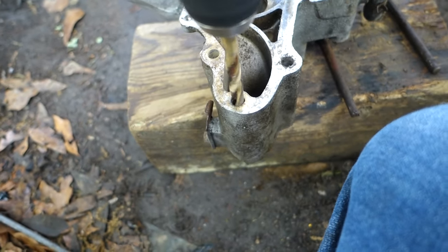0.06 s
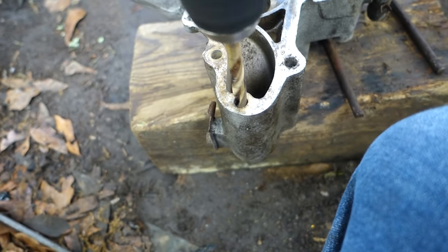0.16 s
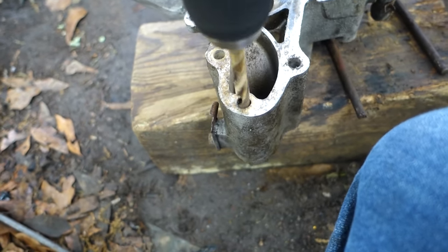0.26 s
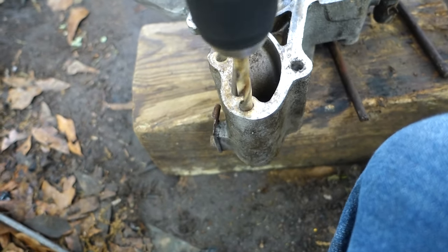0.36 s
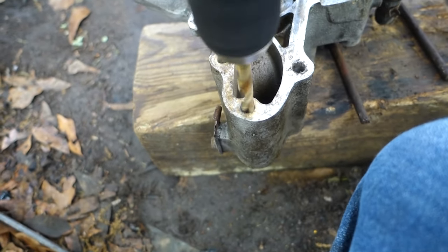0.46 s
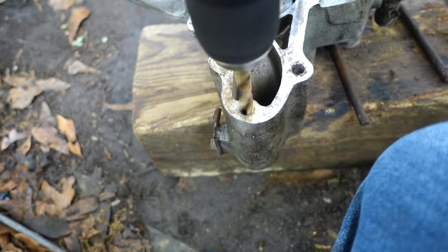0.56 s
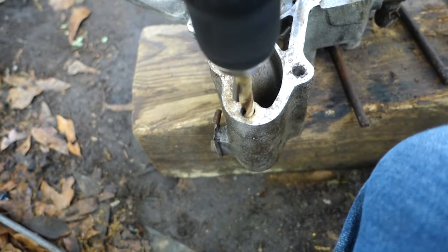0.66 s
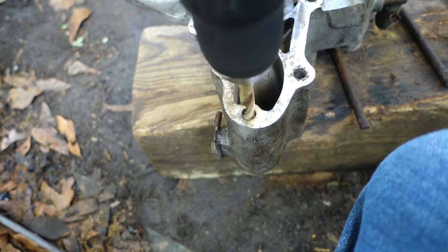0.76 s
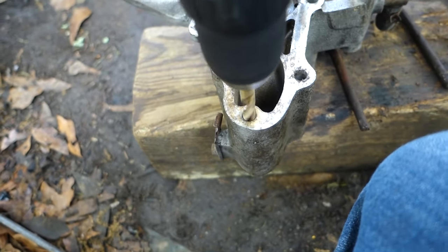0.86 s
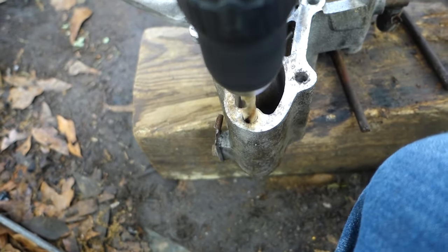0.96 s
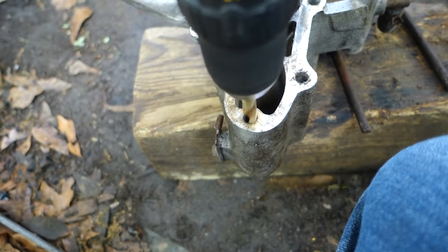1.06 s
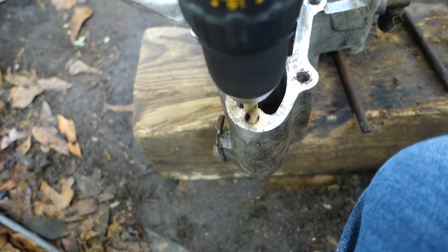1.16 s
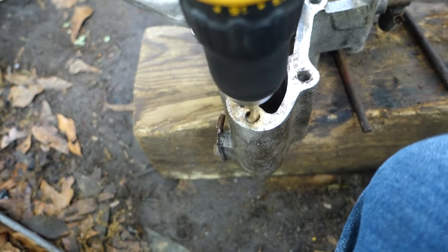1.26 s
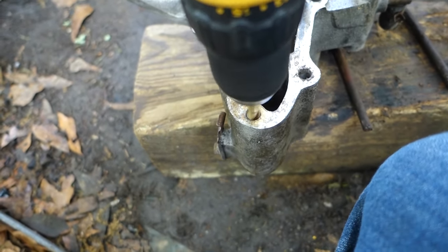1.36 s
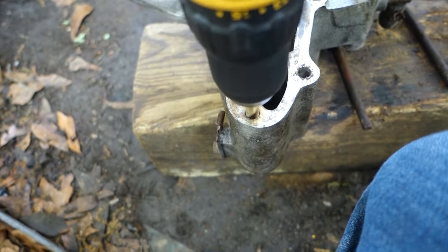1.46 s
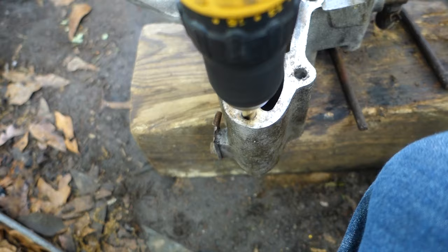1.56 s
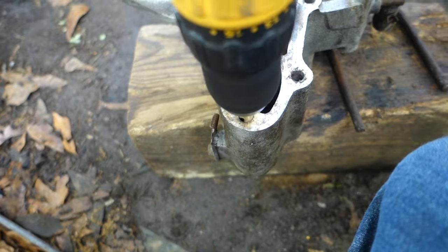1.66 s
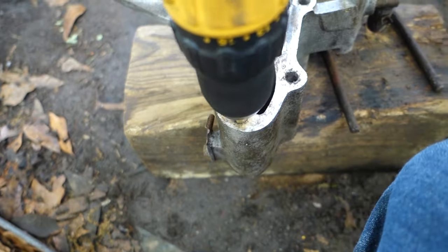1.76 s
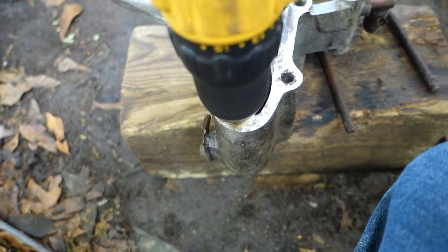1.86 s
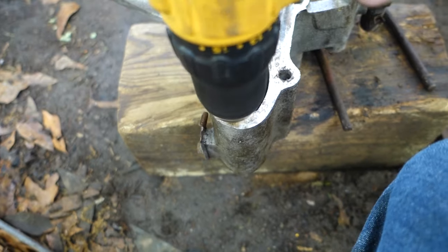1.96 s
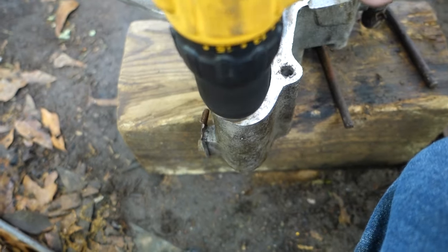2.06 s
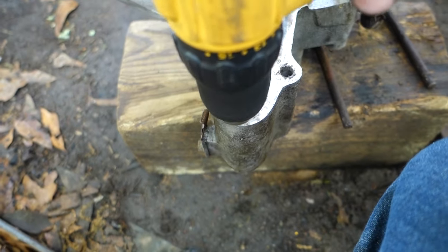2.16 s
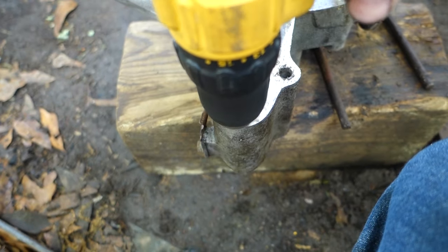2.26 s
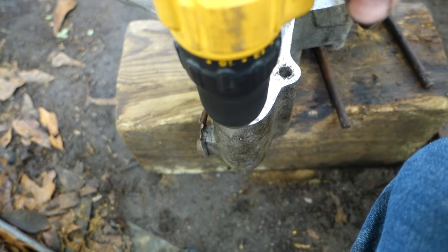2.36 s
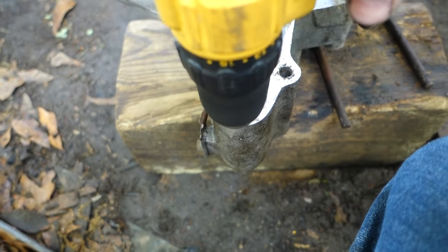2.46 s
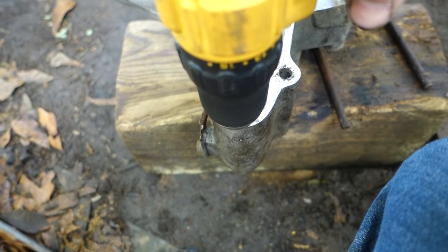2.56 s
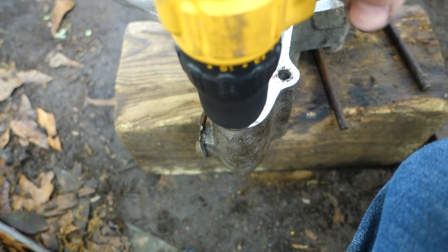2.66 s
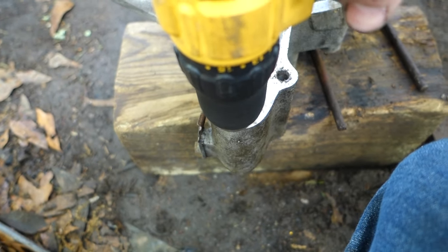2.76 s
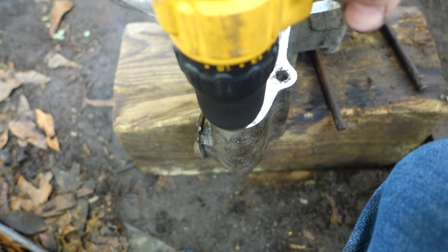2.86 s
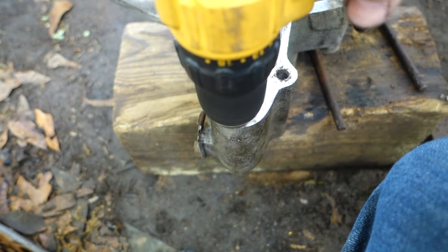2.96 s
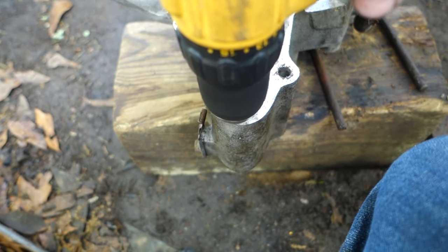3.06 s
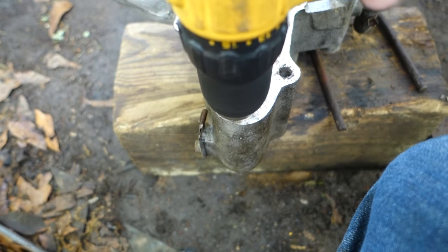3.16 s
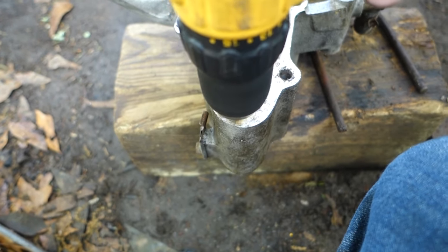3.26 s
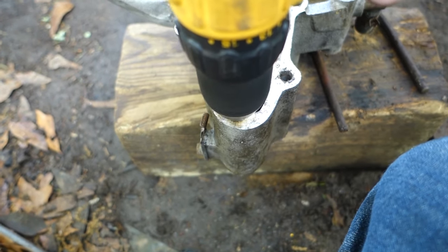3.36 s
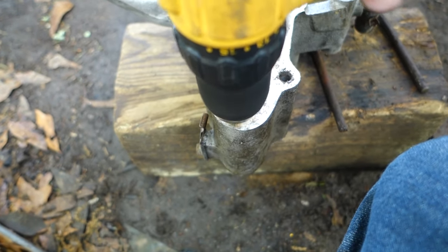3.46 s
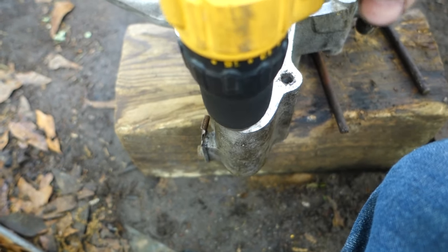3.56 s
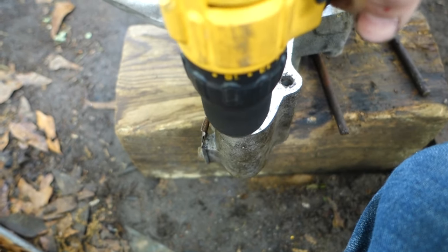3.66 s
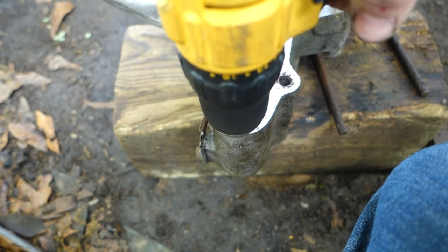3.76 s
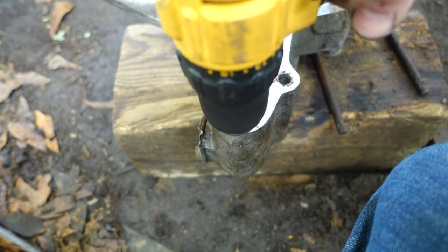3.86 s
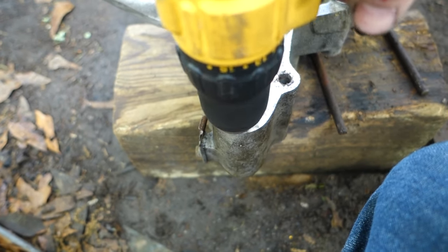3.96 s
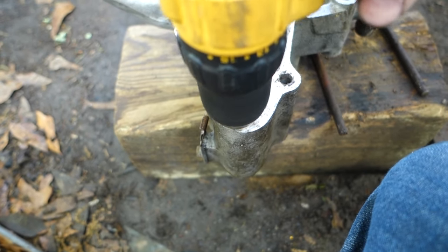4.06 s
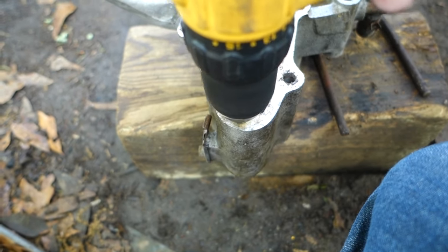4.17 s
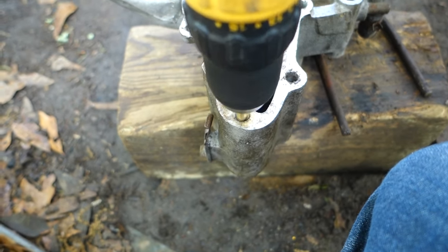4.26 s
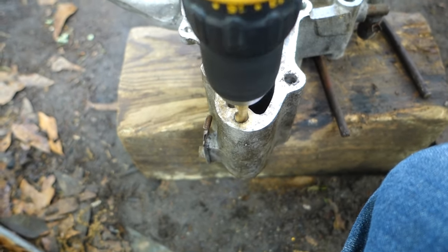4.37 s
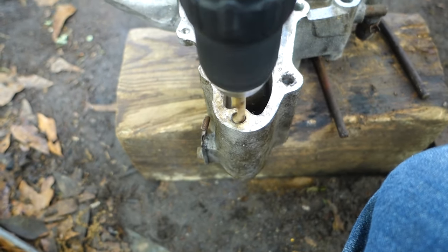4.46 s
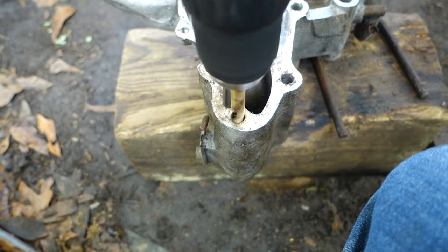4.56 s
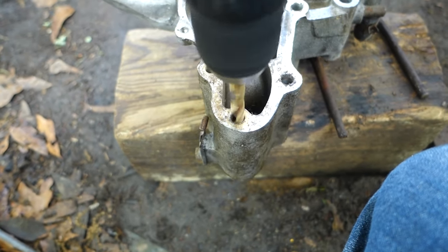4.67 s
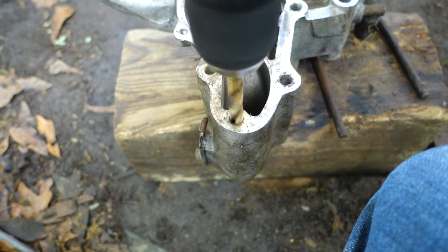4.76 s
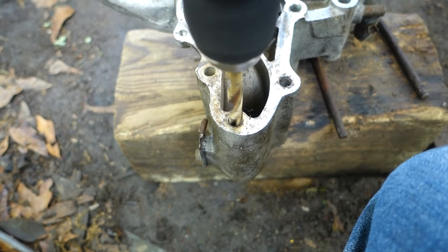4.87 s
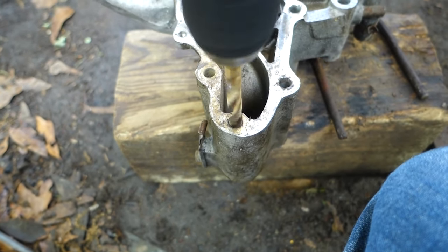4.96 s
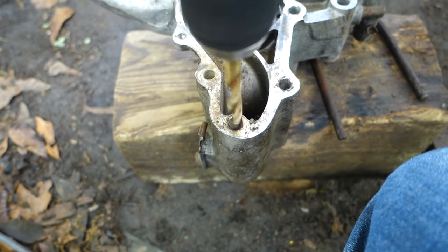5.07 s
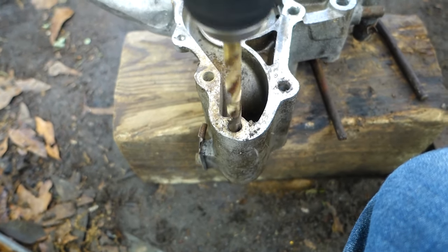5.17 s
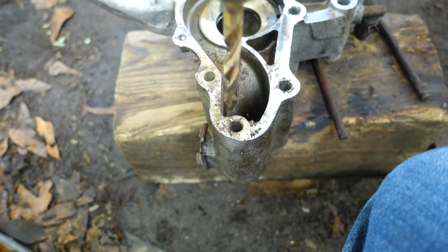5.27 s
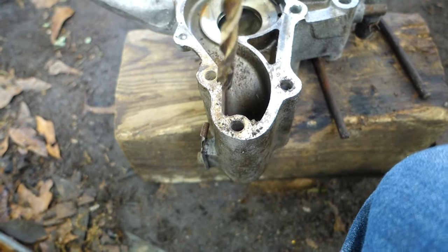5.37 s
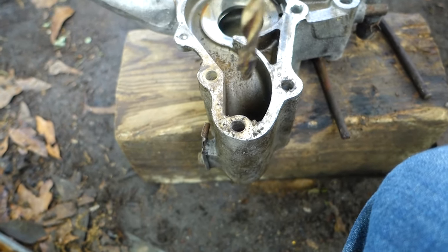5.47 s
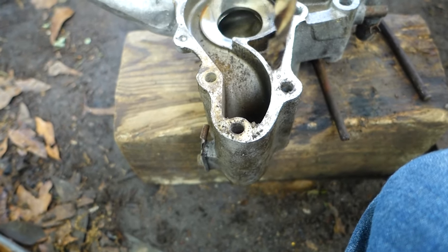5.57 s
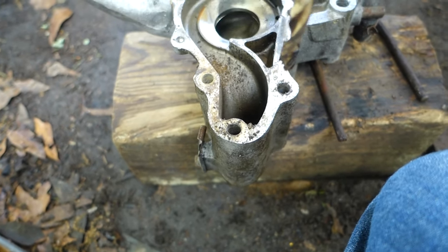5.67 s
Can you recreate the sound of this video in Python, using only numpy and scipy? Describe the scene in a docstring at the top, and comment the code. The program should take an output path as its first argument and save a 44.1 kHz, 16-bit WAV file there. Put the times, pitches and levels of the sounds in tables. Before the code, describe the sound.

Outdoors, close to the microphone in stereo, a power drill sings with a bright, layered electric whine over buzzing, throbbing hiss. Sharp sliding chirps, leaning left, cluster as the bit moves deep in metal, then become fewer and shorter while it is pulled out. After five seconds the motor slows quickly and locks with several dry knocks; a little hiss and metallic ring fade into low distant rumble.

```python
"""A cordless drill is pushed down a hole in a metal casting outdoors, drawn out again and stopped.
Commutator, gear mesh and single rotor multiples sing as tones locked to the rotor; the speed switch
whistles at a fixed pitch. Looped rotor buzz and throbbing fan hiss are coloured by the housing.
The bit squeaks on the hole wall in sliding chirps that make the recorder's limiter duck; the brake
clacks as filtered noise cracks and the casting rings on as a sine over a quiet, rumbling yard."""
import sys
import numpy as np
from scipy import signal
from scipy.fft import rfft, irfft
from scipy.io import wavfile
from scipy.ndimage import uniform_filter1d

SR = 44100
rng = np.random.default_rng(int(sys.argv[2]) if len(sys.argv) > 2 else 0)


def materialize(psi):
    """Save the field psi as 16-bit PCM at rate SR to the path in sys.argv[1].

    A 1-D psi becomes a single channel; in a 2-D psi each row is a channel.
    """
    bounded = np.clip(np.atleast_2d(psi).T, -1, 1)
    quanta = np.round(bounded * 32767).astype(np.int16)
    wavfile.write(sys.argv[1], SR, quanta)


N = 252541  # samples

RELEASE_S, LOCK_S = 5.165, 5.263  # trigger let go, brake locks
SWITCH_HZ = 3911.5


def amp(db):
    """Turns decibels into an amplitude factor."""
    return 10 ** (np.asarray(db) / 20)


def evened(x):
    """Scales a signal to rms 1."""
    return x / np.sqrt(np.mean(abs(x) ** 2) + 1e-20)


def read(points, hz):
    """Reads a spectrum, straight on a log-frequency axis."""
    f, value = np.transpose(points)
    return np.interp(np.log(hz + 1), np.log(f + 1), value)


def curves(rows, t):
    """Draws straight lines through each column of a table whose first column is time."""
    s, *columns = np.transpose(rows)
    return [np.interp(t, s, c) for c in columns]


def panned(x, db):
    """Spreads a mono sound over both ports, db louder at the left than at the right."""
    return x * amp([[db / 2], [-db / 2]])


def add(mix, s, sound):
    """Lays a sound into the mix at s seconds, cut at the end."""
    part = mix[:, round(s * SR):][:, :sound.shape[1]]
    part += sound[:, :part.shape[1]]


def wander(hz):
    """Slow chance of rms 1, changing about hz times a second."""
    lowpass = signal.butter(2, hz, fs=SR, output="sos")
    return evened(signal.sosfilt(lowpass, rng.standard_normal(N)))


def rotor_turns():
    """Rotor and chuck angle in turns; the load of the bit sways the speed once a chuck turn."""
    # rotor speed under power: start_s, turns_per_s
    rotor = [(0, 154.5), (.14, 161.3), (.3, 170.2), (.46, 177.2), (.62, 179.9), (.76, 178.2), (.91, 179.6),
             (1.1, 177.5), (1.18, 174.4), (1.36, 174.9), (1.52, 171.9), (2.05, 171), (2.15, 172),
             (2.27, 171.2), (2.52, 183.9), (2.75, 186.7), (3.02, 191.6), (3.29, 184), (3.62, 197.3),
             (3.87, 192.9), (4.08, 195.2), (4.21, 193.4), (4.53, 199.7), (4.8, 196.6), (5.05, 200.6),
             (5.15, 198.6)]
    gear_down, chuck_start = 15.24, -.1  # rotor turns a chuck turn, start in turns
    chuck_sag = .005  # share of speed
    slowing = 358  # turns per s lost each second between release and lock
    inertia_s = .08  # the rotor rounds off changes of speed
    t = np.arange(N) / SR
    speed = curves(rotor, t)[0] - slowing * np.clip(t - RELEASE_S, 0, LOCK_S - RELEASE_S)
    speed = uniform_filter1d(speed, size=round(inertia_s * SR), mode="nearest")
    chuck = chuck_start + np.cumsum(speed) / SR / gear_down
    bite = np.interp(t, [2.3, 3.5], [1, .35])  # the flutes bite less once the hole is cleared
    sway = chuck_sag * np.cos(2 * np.pi * chuck) + .004 * wander(8)
    return np.cumsum(speed * (1 + bite * sway)) / SR, chuck


def whine(turns):
    """Commutator, gear mesh and single rotor multiples follow the speed; the switch keeps one pitch."""
    # tone levels before surge and flutter:
    # start_s, commutator_db, mesh_db, mesh_octave_db, switch_db, multiple_25_db, multiple_30_db
    tones = [(0, -25.5, -18.5, -21.5, -20, -43.5, -40), (.3, -26.5, -20.5, -31.5, -19, -48, -44),
             (.9, -25, -24.5, -24, -25.5, -32.5, -54), (1.6, -27.5, -22, -26, -31, -42, -46),
             (2.25, -30, -21.5, -25, -36.5, -40, -47), (2.55, -30.5, -32, -26.5, -39.5, -38, -34),
             (3, -29.5, -28.5, -32, -45, -47, -30), (3.25, -30.5, -32, -26.5, -33.5, -42, -37),
             (3.8, -33, -27, -18.5, -46, -34, -27.5), (4.15, -35, -35, -23, -44, -36, -31.5),
             (4.3, -31.5, -35.5, -20, -34, -25, -28.5), (4.8, -26.5, -29.5, -25, -26, -29, -38.5),
             (5.15, -29.5, -31, -38, -26, -26, -42)]
    # the same six tones: left_minus_right_db
    tone_pan_db = [2.1, .1, 13.6, 0.12, 1.5, 1.4]
    # the same six tones: rms_unsteadiness_db
    tone_flutter_db = [1.6, 1.73, 1.98, 0.85, 1.8, 1.9]
    # strong rotor multiples before flutter and pan: multiple, high_db, deep_db, drawn_out_db
    orders = [(1, -48, -51, -47), (5, -40, -50, -47), (15, -34, -39, -47), (32, -46, -33, -39),
              (65, -52, -35, -37), (31, -44, -35, -37), (33, -46, -34, -42), (43, -46, -31, -35),
              (45, -48, -32, -35), (40, -46, -35, -38), (53, -46, -35, -32), (50, -42, -29, -34),
              (60, -37, -48, -46), (78, -37, -46, -46), (56, -44, -33, -31), (2, -51, -56, -53),
              (71, -41, -42, -35)]
    bars, mesh = 12, 144 / 11  # commutator bars and gear teeth passing each rotor turn
    surge_db = 1.8  # the tones swell and sink several times a second
    chatter = 0.13  # slack of the 25th multiple, in cycles
    switch_throb = 0.23  # the switch whistle throbs once a rotor turn
    t = np.arange(N) / SR
    depth = np.interp(t, [2.2, 3.45, 4.15, 4.55], [0, 1, 1, 2])  # high, deep, drawn out
    # load on the gear teeth
    cutting = np.interp(t, [.07, .12, .25, .45, 3.3, 3.6], [.6, .15, .15, 1, 1, .2])
    driven = np.interp(t, [RELEASE_S - .01, RELEASE_S], [1, 0])  # the trigger is let go
    # the brake loads, then holds the rotor
    brake_s = [RELEASE_S, RELEASE_S + .035, LOCK_S - .005, LOCK_S + .005]
    turning = np.interp(t, brake_s, [1, 1.4, 1.6, 0])
    fading = np.interp(t, [RELEASE_S, RELEASE_S + .06], [1, 0])  # the teeth unload
    play = np.interp(t, [2.2, 2.6], [.025, .07]) * wander(70)  # backlash between the teeth, in cycles
    cycles = [bars * turns, mesh * turns + play, 2 * mesh * turns + 2 * play, SWITCH_HZ * t,
              25 * turns + chatter * wander(40), 30 * turns]
    whistling = driven * (1 + switch_throb * np.cos(2 * np.pi * turns))
    gates = [turning, fading, cutting * driven, whistling, fading, fading]
    levels_db = curves(tones, t) + surge_db * np.array([wander(17.2) for _ in cycles])
    out = 0
    for cycle, db, gate, pan_db, flutter_db in zip(cycles, levels_db, gates, tone_pan_db, tone_flutter_db):
        level = gate * amp(db + flutter_db * wander(44))
        out = out + panned(level * np.cos(2 * np.pi * cycle), pan_db)
    for k, *db in orders:
        high = k > 20  # the high multiples flutter fast, favour the left and reach the ports out of step
        level = amp(np.interp(depth, [0, 1, 2], db) + 2.96 * wander(30 if high else 10))
        level = level * (fading if high else turning)
        lag = np.array([[0], [high * rng.normal(0, 0.17)]]) + rng.random()  # cycles
        out += level * np.cos(2 * np.pi * (k * turns + lag)) * amp([[0.5 * high], [-1.0 * high]])
    return np.sqrt(2) * out


def buzz(turns):
    """A waveform that repeats every rotor turn; three blends of its multiples drift slowly in level."""
    k, out = np.arange(4097), 0
    for _ in range(3):
        phases = np.exp(2j * np.pi * rng.random(4097))
        lines = amp(3 * rng.standard_normal(4097)) * phases
        one_turn = evened(irfft(lines * (k > 33) * (k < 95)))
        wave = np.interp(turns % 1, np.arange(8192) / 8192, one_turn, period=1)
        out = out + amp(3.3 * wander(2.7)) * wave
    return evened(out)


def air(turns, chuck):
    """Fan hiss, throbbing with rotor and flutes, and rotor buzz, coloured by housing and posture."""
    # air and buzz together, up to the lock: start_s, level_db, buzz_minus_hiss_db
    drill = [(0, -15.5, -1), (.7, -16, -10), (1.7, -16.5, -2.5), (2.2, -17.5, -6), (2.5, -16, -1.5),
             (3.35, -18.5, -6), (3.6, -15.5, 0.5), (4.1, -17, 0), (4.6, -15.5, -2.5), (5.1, -15.5, -3.5),
             (5.26, -17.5, -23)]
    # where the drill is held: start_s, posture (0 high, 1 deep, 2 drawn out)
    postures = [(0, 0), (.7, 0.94), (1.7, 0.36), (2.45, 0.85), (4.1, 0.55), (4.3, 1), (4.55, 2), (5.17, 2),
                (5.22, 2)]
    # relative colour held high over the hole: freq_hz, density_db_per_hz
    high = [(35, -57.5), (60, -17), (1240, -8.5), (1680, -4.5), (2280, 2.5), (3090, -12), (3810, -3),
            (4180, -8.5), (12200, -12), (14100, -9), (15800, -11)]
    # relative colour deep in the hole: freq_hz, density_db_per_hz
    deep = [(35, -59), (60, -32.5), (188, -19.5), (780, -12.5), (2560, -3.5), (4180, -9), (4920, -2.5),
            (6990, -7), (9030, -1), (14100, -12), (15800, -7)]
    # relative colour drawn out: freq_hz, density_db_per_hz
    drawn = [(35, -56), (60, -47), (193, -22), (314, -17.5), (1760, -10), (2330, -6), (3020, -9.5),
             (3810, -4.5), (4180, -0.5), (4810, -7.5), (15800, -10)]
    # housing and vent resonances, added to the colour: freq_hz, width_hz, high_db, drawn_out_db
    housing = [(1321, 133, 7, 6), (3126, 187, -1.5, -7.5), (4800, 180, 7, 8.5), (4290, 430, 8, -6.5),
               (10180, 190, -10, -9.5), (7420, 350, -1, -2), (8760, 340, -1.5, 4), (9560, 320, 0, 4),
               (10920, 790, 0, 4.5), (12000, 890, -7.5, 1), (13680, 710, 10, 7)]
    # likeness of the two ports: freq_hz, correlation (no unit)
    likeness = [(60, .998), (900, 0.93), (2600, 1), (4500, 0.48), (15000, 0.75)]
    # balance of the ports: freq_hz, left_minus_right_db
    balance = [(200, -1), (800, 1.3), (3300, -0.5), (5500, 5.5), (9000, 1), (15000, 2.5)]
    # timing of the ports: freq_hz, left_lead_rad (negative: the right leads)
    lead = [(1200, -0.091), (4400, -0.098), (5200, -0.55), (15000, -0.4)]
    sway_db, sway = 1.5, .006  # the grip shifts: resonances slide (share of pitch), the upper ones swell
    lock_rise_db, fan_t60, fan_tail_db, fan_tail_t60 = 0.5, 0.11, -24.5, 0.51  # after the lock; T60 in s
    throb = 1 + 0.07 * np.cos(2 * np.pi * turns) + 0.018 * np.cos(4 * np.pi * chuck) + 0.085 * wander(17.3)
    hiss = [throb * rng.standard_normal(N) for _ in range(2)]
    hz, t, z = signal.stft([*hiss, buzz(turns), buzz(turns)], SR, nperseg=512)
    buzz_db, posture = curves(drill, t)[1], curves(postures, t)[0]
    a, b = z[:2] + amp(buzz_db) * z[2:]
    same = np.clip(read(likeness, hz), -1, 1)[:, None]
    right = same * a + np.sqrt(1 - same ** 2) * b
    z = np.array([a, right * np.exp(-1j * read(lead, hz))[:, None]])
    # crossfade between the postures
    colour = sum(np.outer(read(points, hz), np.clip(1 - abs(posture - i), 0, 1))
                 for i, points in enumerate([high, deep, drawn]))
    for f, width, high_db, drawn_db in housing:
        slide, swell = (np.interp(t * SR, np.arange(N), wander(1.96)) for _ in range(2))
        db = high_db + (drawn_db - high_db) * np.clip(posture / 2, 0, 1)
        db = db + sway_db * swell * (f > SWITCH_HZ)
        colour += np.exp(-((hz[:, None] - f * (1 + sway * slide)) / width) ** 2) * db
    gain = amp(colour)
    # even power in every frame, so that the drill table alone sets the level
    gain /= np.sqrt((gain ** 2).mean(0) * (1 + amp(buzz_db) ** 2))
    z *= gain * amp(np.outer([.5, -.5], read(balance, hz)))[:, :, None]
    t = np.arange(N) / SR
    after = np.maximum(t - LOCK_S, 0)
    dying = amp(lock_rise_db * (after > 0) - 60 * after / fan_t60)
    dying = dying + amp(fan_tail_db - 60 * after / fan_tail_t60)
    return amp(curves(drill, t)[0]) * dying * signal.istft(z, SR, nperseg=512)[1][:, :N]


def yard():
    """Low distant rumble and faint air, nearly alike at both ports in the lows."""
    # relative colour of the yard: freq_hz, density_db_per_hz
    yard_colour = [(18, -47), (30, -11.5), (93, 0), (496, -27.5), (1300, -22.5), (15800, -55)]
    yard_db = -51.5
    a, b = rng.standard_normal((2, N))
    hz = np.fft.rfftfreq(N, 1 / SR)
    same = np.clip(1 - (hz / 2000) ** 2, .4, 1)
    right = same * rfft(a) + np.sqrt(1 - same ** 2) * rfft(b)
    z = np.array([rfft(a), right]) * amp(read(yard_colour, hz))
    return amp(yard_db) * evened(irfft(z, N))


def squeaks():
    """Stick-slip chirps with overtones; some leave a flute edge ringing."""
    # bit squeaks, levels before throb and pan: start_s, length_s, first_hz, last_hz, level_db,
    # octave_db, ultrasonic_db (at the start), flute_ring_db
    chirps = [(0.169, 0.016, 5440, 5630, -14, -49, -1.5, -48.5),
              (1.432, 0.014, 7200, 6650, 0, -28, 2, -22.5), (1.605, 0.016, 9400, 8000, -1, -41, 1.5, -12),
              (1.721, 0.028, 7160, 6230, -5.5, -28, 5.5, -32),
              (2.078, 0.013, 4720, 5170, -15, -50, -2, -50),
              (2.175, 0.017, 6000, 6250, -3.5, -14, 6.5, -20.5),
              (2.191, 0.015, 4910, 4670, -12, -40, -0.5, -50),
              (2.239, 0.011, 8600, 8600, -2, -40, 8.5, -40.5),
              (2.263, 0.023, 5080, 4670, -7, -31, 1.5, -54),
              (2.332, 0.024, 4020, 4300, -12, -4.5, 6, -18.5),
              (1.508, 0.008, 8700, 8830, -13, -50.5, 0, -49),
              (3.064, 0.019, 4340, 3930, -12, -18, 3.5, -23.5),
              (3.14, 0.023, 4370, 4440, -15, -6.5, -3, -51), (3.373, 0.042, 8800, 6620, -2, -13, 4.5, -16),
              (3.543, 0.019, 6900, 7100, -8, -33, 0, -52), (4.089, 0.026, 4480, 4280, -13.5, -8.5, 3, -51),
              (4.507, 0.0089, 4660, 4400, -14, -36, -5.5, -51),
              (4.545, 0.009, 4750, 4680, -17, -33.5, -9, -50),
              (4.575, 0.0093, 4730, 4500, -12, -26, -2, -52),
              (4.702, 0.011, 4670, 4630, -15.5, -32, -3.5, -50),
              (4.753, 0.011, 7400, 7840, -8.5, -41.5, 3.5, -22),
              (4.779, 0.0088, 4700, 4650, -15, -37, -6, -52), (4.862, 0.019, 4650, 4960, -18, -35, -5, -50),
              (4.899, 0.039, 4700, 4950, -16.5, -39, -6.5, -51.5),
              (5.056, 0.034, 4660, 4990, -15, -37, -1, -50)]
    flute_hz, flute_t60, ultra_hz = 7948, 0.2, 19500  # T60 in s
    twelfth_below_hz, twelfth_db = 5000, -4  # only low squeaks carry a twelfth
    squeak_pan_db, pan_per_ultra_db = 13, 0.3  # the stronger the ultrasonic part, the further left
    glide = .75  # a squeak slides fastest at first
    grip_pitch, throb_db = .022, 5  # unsteadiness of pitch (share) and level
    linger_db, linger_t60 = -8.5, 0.13  # the last pitch of a squeak rings on in the bit; T60 in s
    out = np.zeros((2, N))
    for s, length, hz0, hz1, db, db2, ultra_db, ring_db in chirps:
        db3 = db + twelfth_db if max(hz0, hz1) < twelfth_below_hz else -99
        pan_db = squeak_pan_db + pan_per_ultra_db * ultra_db
        t = np.arange(round(length * SR)) / SR
        # the grip changes by chance every 60 samples, smoothed
        grip = np.repeat(rng.standard_normal((2, 60)), 60, 1)
        grip = uniform_filter1d(grip, 60)[:, :len(t)]
        pitch_hz = (hz0 + (hz1 - hz0) * (t / length) ** glide) * (1 + grip_pitch * grip[0])
        phase = 2 * np.pi * np.cumsum(pitch_hz) / SR
        tone = 0
        for k, d in [(1, db), (2, db2), (3, db3)]:
            tone = tone + amp(d) * np.sin(k * phase) * (k * max(hz0, hz1) < SR / 2.1)
        ultra = amp(ultra_db - 8.0 * t / length) * np.sin(2 * np.pi * ultra_hz * t)
        tone = tone * amp(throb_db * grip[1]) + ultra
        chirp = np.sqrt(2) * tone * signal.windows.tukey(len(t), .4)
        chirp = panned(chirp, pan_db) * amp(-pan_db / 2)
        add(out, s, np.array([chirp[0], np.roll(chirp[1], 2)]))  # right two samples late
        t = np.arange(round(.25 * SR)) / SR
        ring = amp(ring_db - 60 * t / flute_t60) * np.sin(2 * np.pi * flute_hz * t)
        ring = ring * np.clip(t / 0.0035, 0, 1)
        last = amp(db - pan_db / 2 + linger_db - 60 * t / linger_t60) * np.sin(2 * np.pi * hz1 * t)
        add(out, s + 0.82 * length, panned(last * np.clip(t / .002, 0, 1), pan_db))
        add(out, s + 0.32 * length, panned(np.sqrt(2) * ring, 8.0) * amp(4.5))
    return out


def clacks():
    """Each knock is a short dry crack that sets the casting ringing."""
    # knocks in brake and chuck: start_s, peak_db, tilt_db (per doubling of frequency + 6600 Hz)
    knocks = [(3.73, -19, -3), (5.262, -6, -2), (5.276, -0.5, -17.5), (5.283, -10.5, -10), (5.291, -11, -1),
              (5.305, -6, -8), (5.315, -6.5, -12), (5.319, -6.5, -9), (5.387, -27, -12), (5.392, -24, -15),
              (5.395, -30, -14)]
    casting_hz, casting_t60 = 855.5, 1.4  # T60 in s
    ring_db, ring_in_hole_db = -49, -1.5  # ring against the knock, through the air or struck by the bit
    out, t = np.zeros((2, N)), np.arange(SR // 2) / SR
    hz = np.fft.rfftfreq(len(t), 1 / SR)
    for s, db, tilt_db in knocks:
        crack = rng.standard_normal((2, len(t))) * (amp(-60 * t / 0.0095) + 0.031 * amp(-60 * t / 0.17))
        crack[1] = 0.87 * crack[0] + 0.51 * crack[1]  # the ports hear nearly the same
        tilt = amp(tilt_db * np.log2(hz / 2000 + 3.3)) * hz ** 4 / (hz ** 4 + 330 ** 4)  # no lows
        knock = irfft(rfft(crack) * tilt, len(t)) * np.clip(t / 0.0012, 0, 1) * np.clip(2 - t / .1, 0, 1)
        ring = amp(db + ring_db - 60 * t / casting_t60) * np.sin(2 * np.pi * casting_hz * (t + s))
        if s < RELEASE_S:  # the bit in the hole damps the casting
            ring *= amp(ring_in_hole_db - ring_db - 60 * t / 0.087)
        add(out, s, amp(db) * knock / abs(knock).max() + ring)
    return out


def scene():
    """The drill, its squeaks and knocks, and the yard, all heard at two ports."""
    turns, chuck = rotor_turns()
    return whine(turns) + air(turns, chuck) + squeaks() + clacks() + yard()


def record(dry):
    """A linked limiter ducks both channels when either is too loud; then the band limit."""
    limit_db, edge_hz = -6.5, 15820
    power_db = 10 * np.log10(abs(uniform_filter1d((dry ** 2).max(0), 90)) + 1e-12)
    fall = np.arange(N) * 700.0 / SR  # recovery of 700 dB a second
    held_db = np.maximum.accumulate(power_db + fall) - fall
    over_db = np.maximum(held_db - limit_db, 0)
    ducked = dry / amp(uniform_filter1d(over_db, 60))
    lowpass = signal.firwin(1023, edge_hz, window=("kaiser", 9), fs=SR)
    return signal.oaconvolve(ducked, lowpass[None], "same")


dry = scene()
out = record(dry)
materialize(out)
```